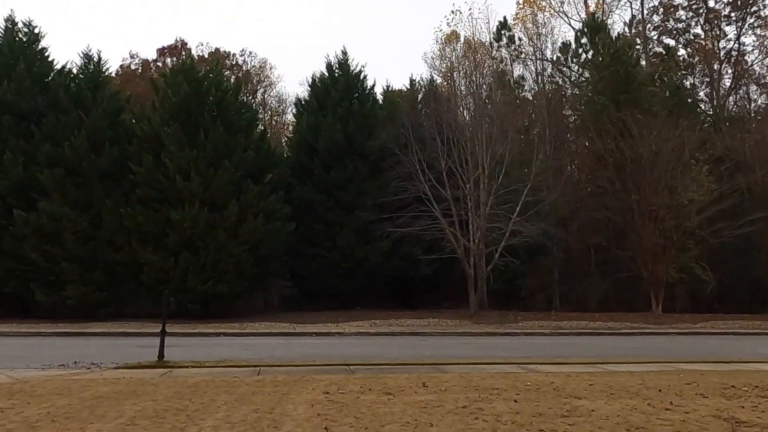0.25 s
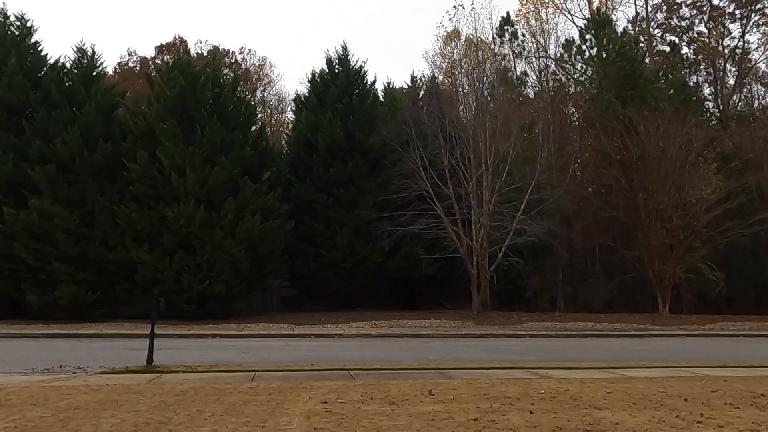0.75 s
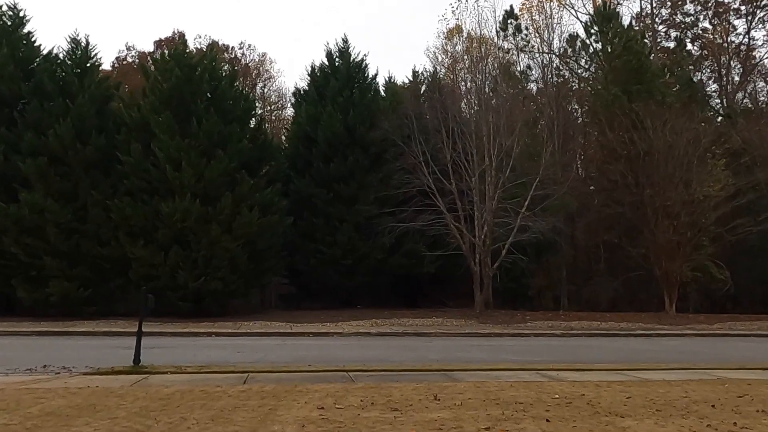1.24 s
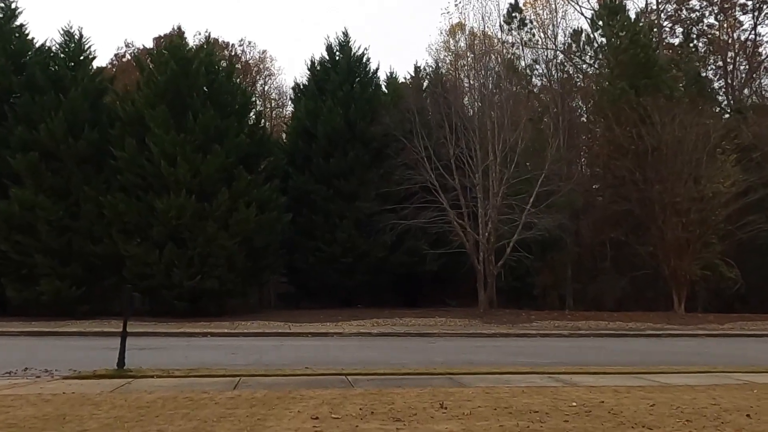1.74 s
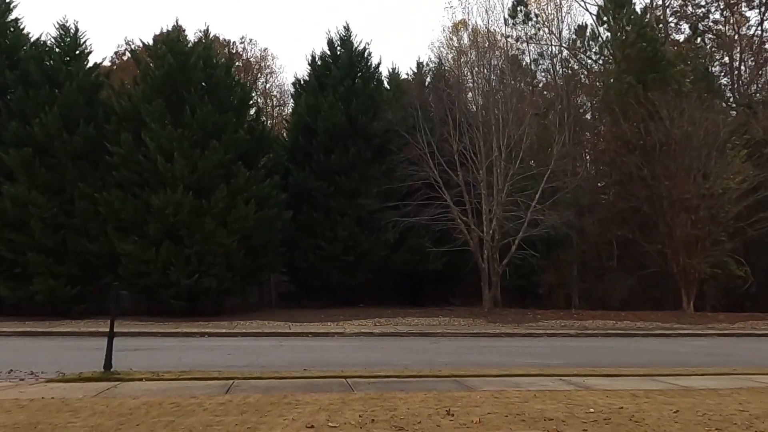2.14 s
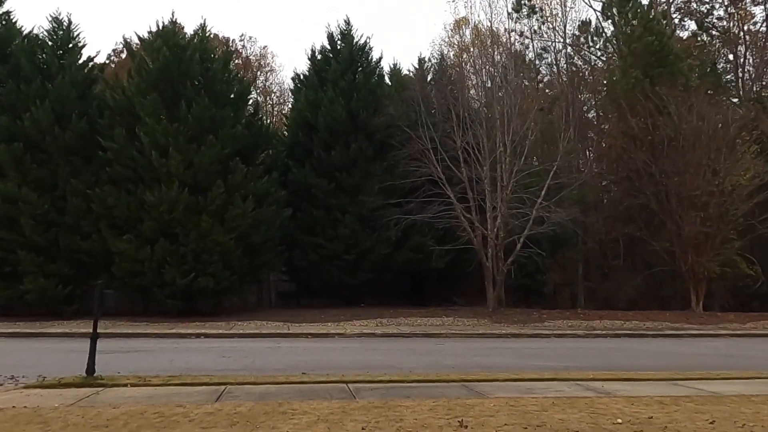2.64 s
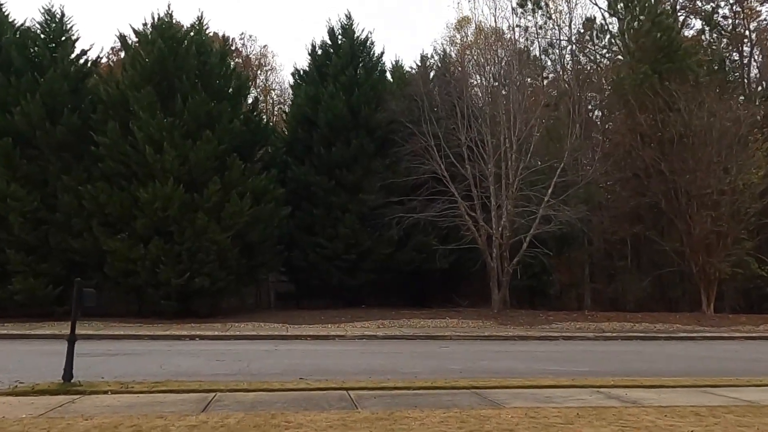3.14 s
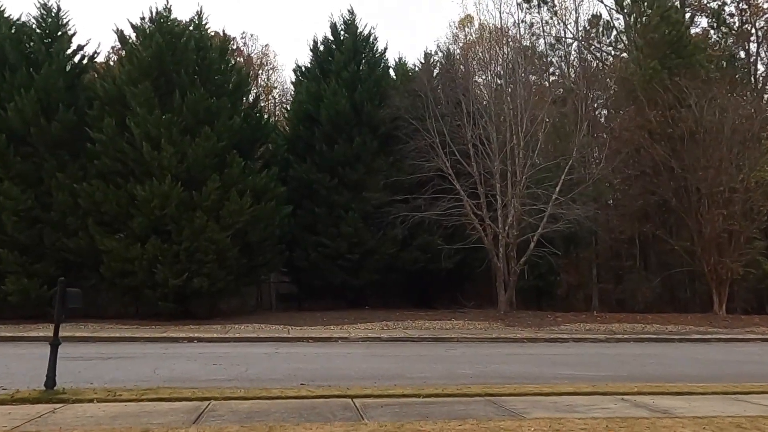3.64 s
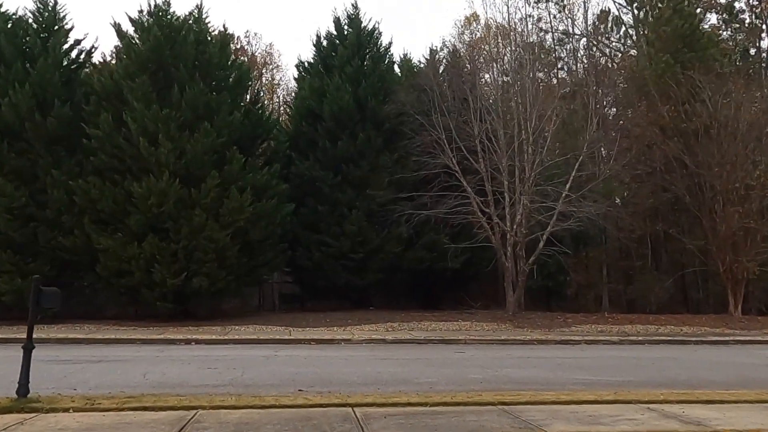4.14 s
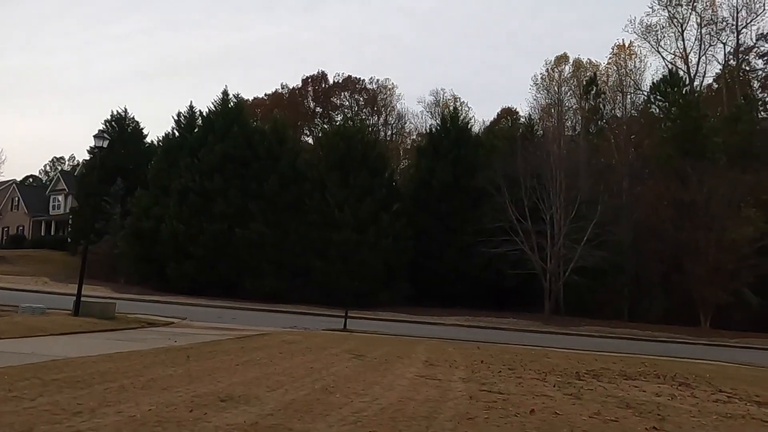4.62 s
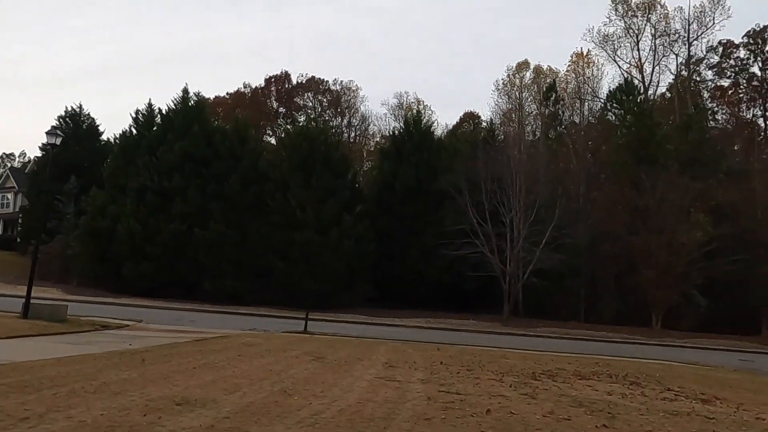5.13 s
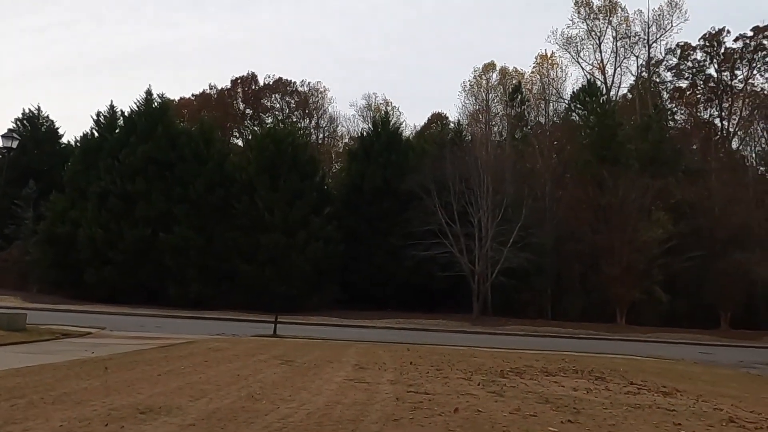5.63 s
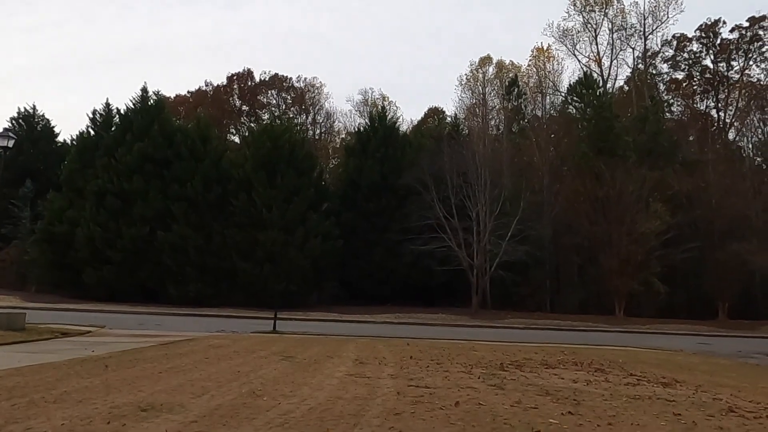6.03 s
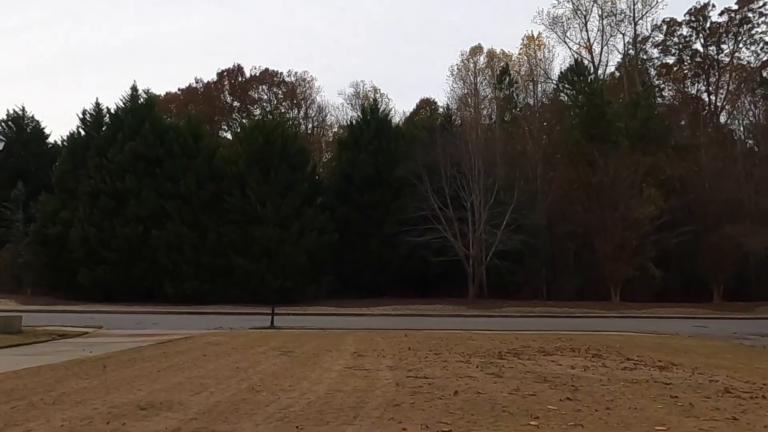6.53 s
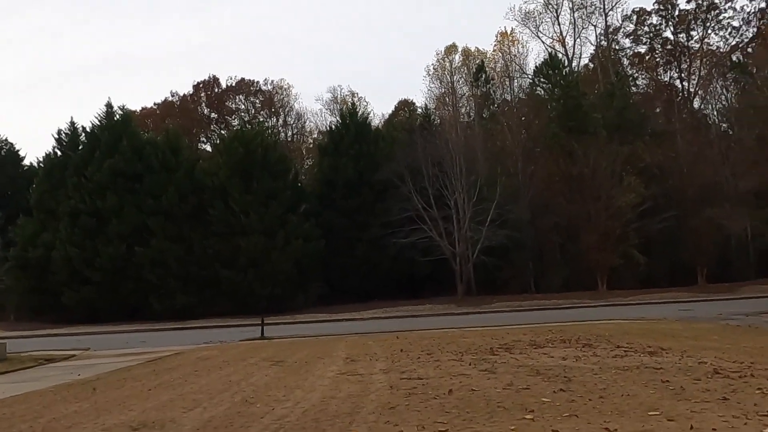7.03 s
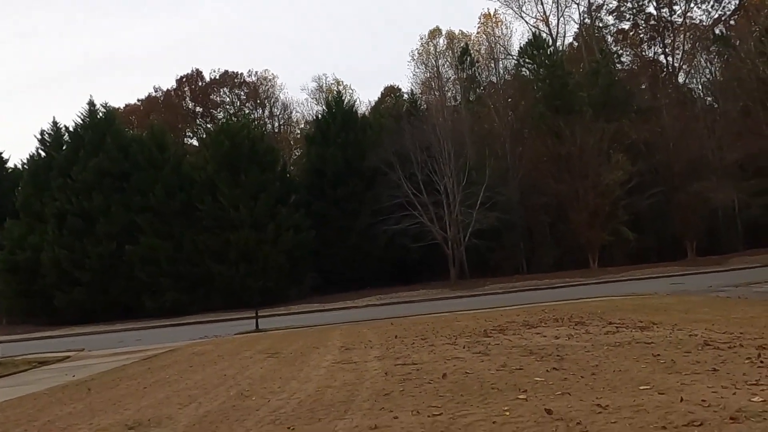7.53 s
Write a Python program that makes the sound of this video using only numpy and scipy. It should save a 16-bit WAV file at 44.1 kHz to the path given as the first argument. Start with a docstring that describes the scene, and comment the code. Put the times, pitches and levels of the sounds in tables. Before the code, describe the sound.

From the seat of an electric riding mower: droning blades, breathy deck roar and hiss, crackling shredded leaves, and a single small click past four seconds.

```python
"""Three mower blades hum and beat against each other from the first moment, heard from the seat
of an electric riding mower as it drives over a dry lawn strewn with leaves.
Sine harmonics make the hum and thin motor whine, coloured noise the air rushing through the deck,
and random tiny snaps the shredded leaves, with clumps of leaves and twigs now and then.
Midway there is a brief click, after which the rush has a slightly different colour."""
import sys
import numpy as np
from scipy import signal
from scipy.fft import rfft, irfft
from scipy.io import wavfile

SR = 44100
rng = np.random.default_rng(int(sys.argv[2]) if len(sys.argv) > 2 else 0)


def to_wav(s):
    """Save 16-bit WAV."""
    ch = np.atleast_2d(s).T  # columns
    pcm = np.round(np.clip(ch, -1, 1) * 32767)  # PCM
    wavfile.write(sys.argv[1], SR, pcm.astype(np.int16))


N = 342656
TIME = np.arange(N) / SR
CLICK_S = 4.2442


def from_db(db):
    """Decibels to gain."""
    return 10 ** (np.asarray(db) / 20)


def rms_one(x):
    """Scale to unit power."""
    return x / np.sqrt(np.mean(x ** 2) + 1e-20)


def in_time(rows):
    """Draw each column of a (time, value, ...) table as a curve of straight lines, one value per sample."""
    s, *columns = np.transpose(rows)
    return [np.interp(TIME, s, column) for column in columns]


def drift(rate_hz):
    """Slow chance with spread 1, changing about `rate_hz` times a second: noise through two equal poles."""
    step = 40  # samples between computed points
    settle = 2000  # points dropped while the filter settles
    pole = np.exp(-2 * np.pi * rate_hz * step / SR)
    noise = rng.standard_normal(N // step + 2 + settle)
    slow = signal.lfilter([1], [1, -2 * pole, pole * pole], noise)[settle:]
    return np.interp(np.arange(N) / step, np.arange(len(slow)), rms_one(slow))


def coloured(x, spectrum):
    """Give x a spectrum of (Hz, dB) points that falls away above its last point; unit power."""
    hz, db = np.transpose(spectrum)
    bins = np.maximum(np.fft.rfftfreq(N, 1 / SR), 1)
    gain = from_db(np.interp(np.log(bins), np.log(hz), db))
    gain = gain / np.maximum(bins / hz[-1], 1) ** 4
    return rms_one(irfft(rfft(x) * gain, N))


def blade_hum(angle, shake):
    """Three blades sound the same harmonics, which add or cancel as one gains on another;
    the ride shakes each a little."""
    # hum at the seat, one row per harmonic from the first up: (first, second, third blade level [dB])
    hum_levels = [(-26, -33, -20), (-23.5, -19.5, -17), (-24.5, -27.5, -40), (-28.5, -47.5, -30)]
    # blades slipping in and out of step, so the hum swells and fades:
    # (time [s], lead of the second blade on the first [passes], lead of the third [passes])
    blade_leads = [(0.0, -0.098, 0.091), (0.53, 0.038, 0.2), (0.69, -0.12, 0.077), (1.41, -0.235, 0.1),
                   (1.72, -0.19, 0.11), (2.13, -0.13, 0.22), (2.69, -0.12, 0.55), (2.84, -0.128, 0.65),
                   (3.02, -0.031, 0.71), (3.14, 0.011, 0.71), (3.49, -0.075, 0.61), (4.13, 0.02, 0.67),
                   (4.26, -0.058, 0.64), (4.92, 0.16, 0.71), (5.06, 0.0014, 0.67), (5.54, 0.032, 0.73),
                   (6.18, 0.25, 0.76), (6.54, 0.27, 0.77), (7.02, 0.133, 0.78), (7.18, 0.043, 0.74),
                   (7.57, 0.052, 0.662), (7.77, 0.18, 0.67)]
    leads = [0, *in_time(blade_leads)]
    starts = rng.uniform(0, 2 * np.pi, len(hum_levels))
    out = np.zeros(N)
    for lead, levels_db in zip(leads, np.transpose(hum_levels)):
        blade = angle + 2 * np.pi * lead
        tone = np.zeros(N)
        for harmonic, (db, start) in enumerate(zip(levels_db, starts), 1):
            tone += from_db(db) * np.sin(harmonic * blade + start)
        out += np.sqrt(2) * tone * (1 + shake * drift(7.2))
    return out


def spindle_tones(angle, partials, twin_db, lead_hz, slip):
    """Tones (multiple, dB) of the near spindle; a fainter twin runs slightly faster and beats with them."""
    near = angle + slip * drift(0.72)  # slip: spread of the wander [rad]
    twin = angle + slip * drift(1.0) + 2 * np.pi * lead_hz * TIME
    twin_gain = from_db(twin_db)
    out = np.zeros(N)
    for multiple, db in partials:
        start = rng.uniform(0, 2 * np.pi, 2)
        near_tone = np.sin(multiple * near + start[0])
        twin_tone = twin_gain * np.sin(multiple * twin + start[1])
        out += from_db(db) * (near_tone + twin_tone)
    return out * np.sqrt(2 / (1 + twin_gain ** 2))  # each level counts both spindles


def blade_buzz(angle):
    """The fifth and sixth harmonics of the pass rate swell and fade above the hum."""
    # (time [s], fifth harmonic level [dB], sixth harmonic level [dB])
    buzz_levels = [(0, -38, -48), (.8, -30, -35), (1.6, -41, -34.5), (2.7, -29, -36), (3.2, -42, -26.5),
                   (3.9, -28, -35), (4.4, -42, -34), (4.85, -33, -31), (5.3, -42.5, -47), (7.77, -39, -40)]
    partials = enumerate(in_time(buzz_levels), 5)
    return spindle_tones(angle, partials, twin_db=-10, lead_hz=0.15, slip=0.13)


def upper_harmonics(angle):
    """Faint harmonics above the buzz hold set levels, while near and twin spindle beat."""
    # (multiple of the pass rate, level [dB])
    overtone_levels = [(7, -37.5), (8, -43.5), (9, -48), (10, -53.5), (11, -49.5)]
    return spindle_tones(angle, overtone_levels, twin_db=-5, lead_hz=0.1491, slip=0.23)


def motor_whine(angle):
    """Thin high tones of the motors, locked to the pass rate and beating a few times a second."""
    # one entry per tone: (multiple of the pass rate)
    whine_multiples = [20, 25, 35]
    # one entry per tone: (level before the swell [dB])
    base_levels = [-40, -49, -53]
    # one entry per tone: (share of the swell it follows)
    swell_shares = [0.94, .6, .2]
    # the whine swelling and fading: (time [s], full swell [dB])
    whine_swell = [(0, -1), (.3, -1), (1.5, -4.5), (2.1, -1.5), (2.8, 1.5), (3.5, -2), (4.2, 1.5), (5.3, 3),
                   (5.95, 7), (6.5, 0.5), (7.1, 3.5), (7.77, -8)]
    swell_db, = in_time(whine_swell)
    levels_db = [db + share * swell_db for db, share in zip(base_levels, swell_shares)]
    return spindle_tones(angle, zip(whine_multiples, levels_db), twin_db=-7.5, lead_hz=.18, slip=0.051)


def eddies(angle, throb, flutter_db):
    """Turbulence off the blade tips: noise pulsing slightly at each pass and fluttering at random."""
    pulse = 1 + throb * np.cos(angle)
    return rng.standard_normal(N) * pulse * from_db(flutter_db * drift(25))


def deck_roar(angle):
    """Turbulent air gives a low roar under the deck."""
    # (frequency [Hz], relative level [dB per Hz])
    roar_spectrum = [(30, -40.5), (70, -28), (105, -8.5), (150, -6.5), (200, 2.5), (270, -4.5), (340, -1),
                     (490, 0.5), (650, -3.5), (740, -8), (880, -5.5), (1000, -10.5), (1150, -18),
                     (1500, -33)]
    # (time [s], level [dB])
    roar_level = [(0, -21), (.4, -22.5), (1.7, -22.5), (2, -19), (2.55, -20.5), (3.35, -17.5),
                  (4.05, -20.5), (4.85, -19), (5.3, -19.5), (5.85, -19), (6.65, -21), (7.05, -19),
                  (7.77, -21.4)]
    level_db, = in_time(roar_level)
    return from_db(level_db) * coloured(eddies(angle, throb=0.042, flutter_db=0.25), roar_spectrum)


def resonance(hz, db, width_hz):
    """A mode shaken by turbulence: its amplitude and phase change at random."""
    phase = 2 * np.pi * np.cumsum(hz) / SR
    lowpass = signal.butter(2, width_hz / 2, fs=SR, output="sos")
    shake = signal.sosfilt(lowpass, rng.standard_normal((2, N)))
    return from_db(db) * rms_one(shake[0] * np.cos(phase) + shake[1] * np.sin(phase))


def air_resonances():
    """Two broad resonances colour the rushing air; their pitch and level shift over time."""
    # both: (time [s], centre [Hz], level [dB])
    lower_mode = [(0, 667.5, -33.5), (1.2, 720.5, -35), (1.8, 720, -30), (2.4, 720.6, -32), (3, 696, -30.5),
                  (4.3, 704, -33), (4.85, 688, -32), (5.5, 875, -28), (6.3, 903, -33), (7.1, 942, -26.5),
                  (7.77, 900, -28.5)]
    upper_mode = [(0, 1560, -41), (1.2, 1560, -50), (2.4, 1540, -43), (3, 1330, -37.5), (3.5, 1540, -43),
                  (4.2, 1600, -50), (4.35, 2150, -44), (4.85, 2150, -33), (5.2, 2150, -43),
                  (5.6, 1630, -37), (6.75, 1640, -36.5), (7.1, 1180, -39), (7.77, 1165, -34)]
    lower = resonance(*in_time(lower_mode), width_hz=180)
    upper = resonance(*in_time(upper_mode), width_hz=300)
    return lower + upper


def tip_hiss(angle):
    """Air hisses off the blade tips, in a slightly different colour after the click."""
    # before and after the click: (frequency [Hz], relative level [dB per Hz])
    early_spectrum = [(900, -22), (1280, 1.5), (1420, -1), (1570, 1), (1850, -0.5), (2170, 3), (2700, -4),
                      (3700, -11.5), (4850, -15), (5400, -22.5), (6200, -23.5), (8500, -32), (9600, -31),
                      (12000, -52)]
    late_spectrum = [(900, -17.5), (1290, 1.5), (1420, -5), (1600, -0.5), (1850, -2.5), (2280, 2.5),
                     (2700, -3), (3700, -11), (4800, -12.5), (5400, -22), (6200, -22), (8500, -33),
                     (9500, -34), (12000, -53.5)]
    # (time [s], level [dB])
    hiss_level = [(0, -33.5), (.7, -34.5), (1.7, -32.5), (2.15, -32), (2.33, -29.5), (2.55, -32),
                  (2.8, -29), (3.2, -31), (3.45, -28.5), (3.7, -31), (4.85, -30.5), (5.25, -31),
                  (5.85, -30.5), (6.6, -31), (7.05, -30), (7.77, -30.5)]
    level_db, = in_time(hiss_level)
    tips = eddies(angle, throb=0.075, flutter_db=1.03)
    early, late = coloured(tips, early_spectrum), coloured(tips, late_spectrum)
    return from_db(level_db) * np.where(TIME < CLICK_S, early, late)


def shredding(angle, per_s, spread_db, chop):
    """Tiny snaps of uneven size, crowding where a blade sweeps by; unit power."""
    # dry leaves being torn: (frequency [Hz], relative level [dB per Hz])
    leaf_spectrum = [(1500, -2), (3000, 7), (4800, 4), (5500, -1.5), (7200, -5.5), (8500, -9.5),
                     (9600, -10), (11000, -18), (12500, -28.5), (15500, -42.5)]
    born = rng.random(N) < per_s * (1 + chop * np.cos(angle)) / SR
    sizes = from_db(spread_db * np.minimum(rng.exponential(1, N), 4))
    signs = rng.choice([-1, 1], N)
    return coloured(born * sizes * signs, leaf_spectrum)


def shredded_leaves(angle):
    """A steady scatter of snaps, louder and softer with how much leaf the blades are shredding."""
    # (time [s], level [dB])
    leaf_level = [(0, -58), (1.1, -53), (1.6, -60), (1.75, -49), (2.35, -45.5), (3.1, -51.5), (3.5, -47),
                  (4.05, -55), (4.7, -51.5), (5.25, -56), (6.7, -57.5), (7.4, -51), (7.77, -45)]
    level_db, = in_time(leaf_level)
    patches_db = 2.0 * drift(8.8)  # leaves lie unevenly on the lawn
    return from_db(level_db + patches_db) * shredding(angle, per_s=1500, spread_db=3.5, chop=0.51)


def clump_envelope(rise_s):
    """A clump is hit at once and then whirls out of the deck; overlapping clumps add in power."""
    # leaves and twigs caught by the blades: (time [s], level before rise and decay [dB], decay time [s])
    clump_hits = [(.359, -38, .012), (0.68, -38, .02), (0.98, -35, .008), (1.144, -37, .01),
                  (1.68, -41, .025), (1.852, -35, 0.029), (1.884, -35, .025), (1.964, -33, 0.015),
                  (2.01, -35, .015), (2.33, -38, .025), (2.73, -37, .012), (3.017, -35, .02),
                  (3.155, -30.5, .012), (3.418, -35, .01), (3.484, -34, 0.011), (3.896, -35, .008),
                  (4.167, -36, .015), (4.822, -36, .012), (4.888, -36, .012), (5.611, -35, .012),
                  (6.512, -35, .014), (6.904, -38, .015)]
    power = np.zeros(N)
    for s, db, decay_s in clump_hits:
        age = np.maximum(TIME - s, 0)
        rise = 1 - np.exp(-age / rise_s)
        decay = np.exp(-np.minimum(age / decay_s, 20))
        power += (from_db(db) * rise * decay) ** 2
    return np.sqrt(power)


def leaf_clumps(angle):
    """Denser snaps burst out wherever the blades catch a clump."""
    return clump_envelope(rise_s=0.00073) * shredding(angle, per_s=3500, spread_db=2.0, chop=0.42)


def click(tick_db, tick_s, thud_db, thud_s):
    """A brief dry tick that decays from its start, with a soft thud rising and falling under it."""
    age = np.clip(TIME - CLICK_S, 0, 1)
    tick = from_db(tick_db) * (age > 0) * np.exp(-np.minimum(age / tick_s, 20))
    thud = from_db(thud_db) * age / thud_s * np.exp(1 - np.minimum(age / thud_s, 20))
    return tick + thud


def scene():
    """The blade speed drives hum, whine, air and leaves together."""
    # blade tips passing: (time [s], pass rate [Hz])
    blade_speed = [(0, 114.5), (.6, 114.5), (1.4, 114.3), (2.1, 114.55), (2.7, 114.3), (3.3, 114.5),
                   (4.1, 114.3), (4.8, 114.25), (5.3, 114.3), (5.8, 114.5), (7.77, 114.45)]
    pass_hz, = in_time(blade_speed)
    angle = 2 * np.pi * np.cumsum(pass_hz) / SR  # one turn of phase per pass
    tones = blade_hum(angle, shake=0.034) + blade_buzz(angle) + upper_harmonics(angle) + motor_whine(angle)
    air = deck_roar(angle) + air_resonances() + tip_hiss(angle)
    leaves = shredded_leaves(angle) + leaf_clumps(angle)
    tick = click(tick_db=-10, tick_s=.00006, thud_db=-11, thud_s=0.001)
    return (tones + air + leaves + tick)[None]  # one channel


def record(dry):
    """A steep elliptic low-pass cuts the top."""
    cutoff_hz = 15600
    lowpass = signal.ellip(10, .1, 90, cutoff_hz, fs=SR, output="sos")
    return signal.sosfilt(lowpass, dry)


dry = scene()
out = record(dry)
to_wav(out)
```